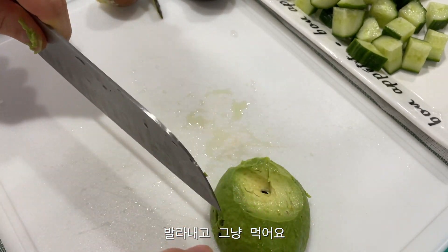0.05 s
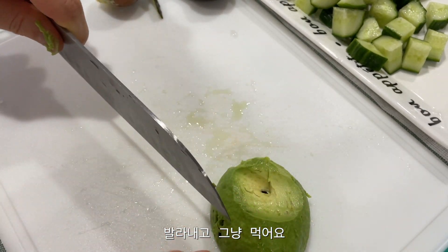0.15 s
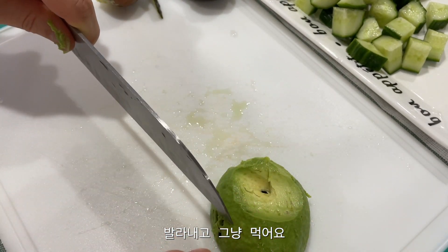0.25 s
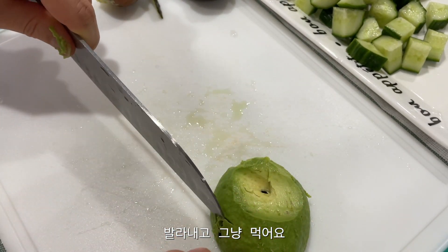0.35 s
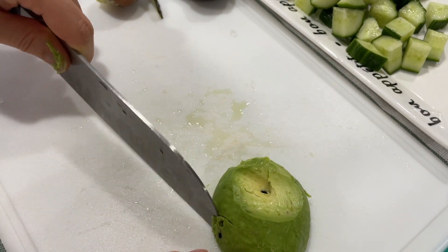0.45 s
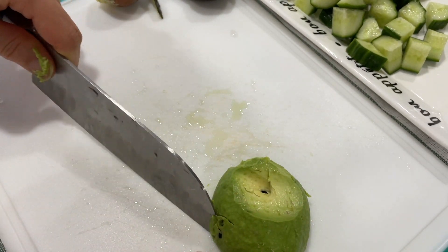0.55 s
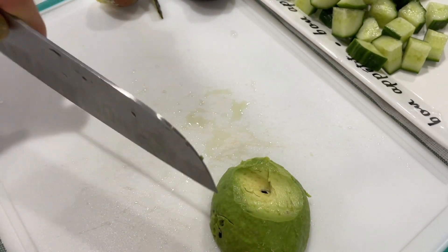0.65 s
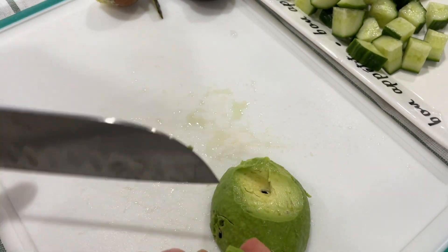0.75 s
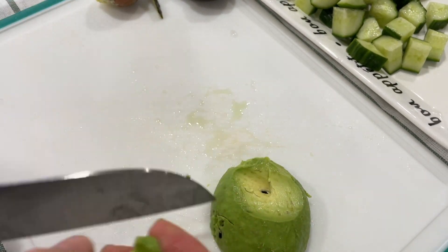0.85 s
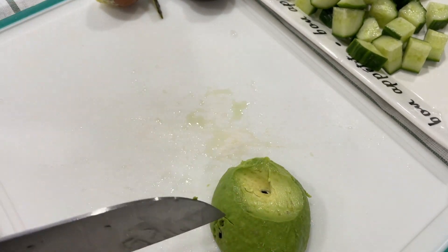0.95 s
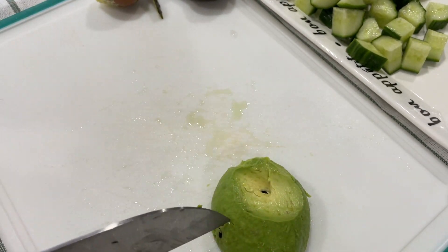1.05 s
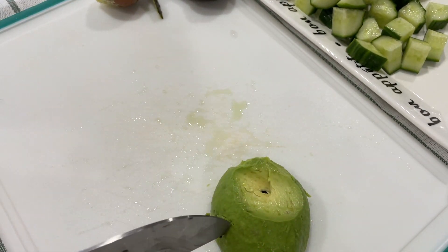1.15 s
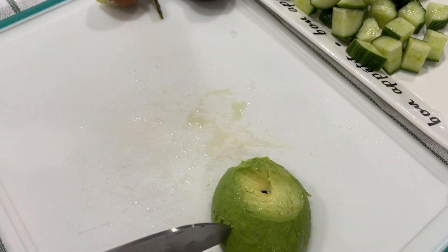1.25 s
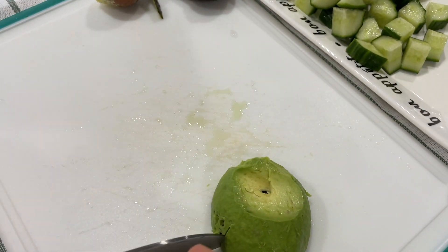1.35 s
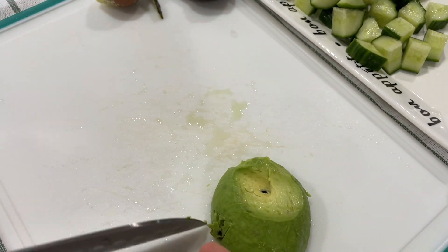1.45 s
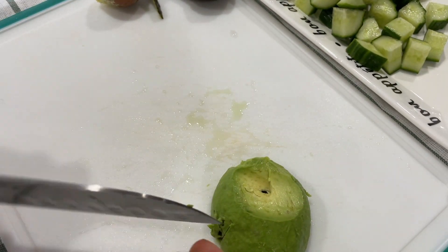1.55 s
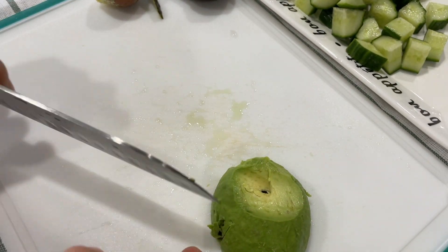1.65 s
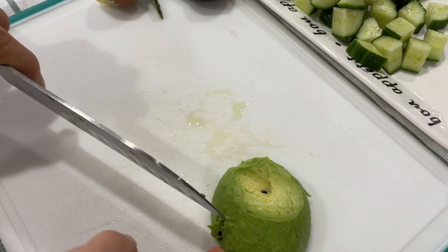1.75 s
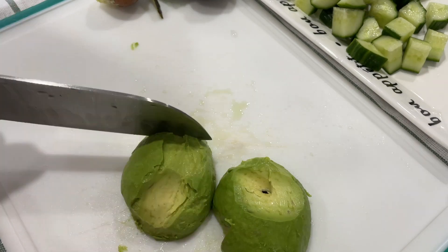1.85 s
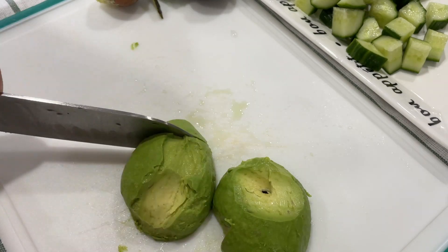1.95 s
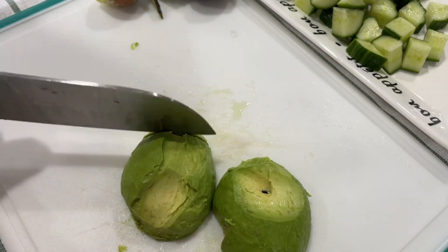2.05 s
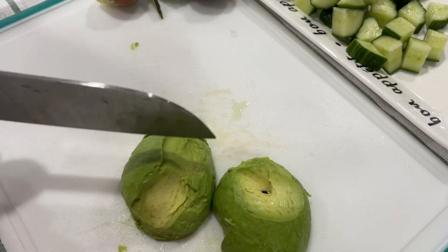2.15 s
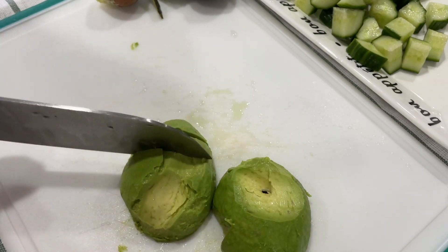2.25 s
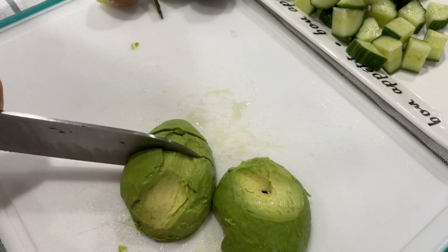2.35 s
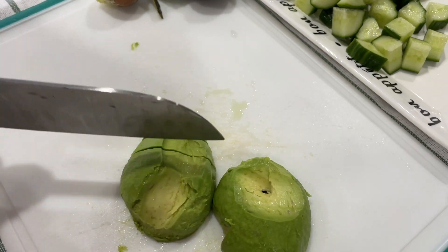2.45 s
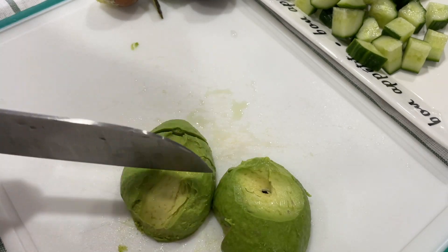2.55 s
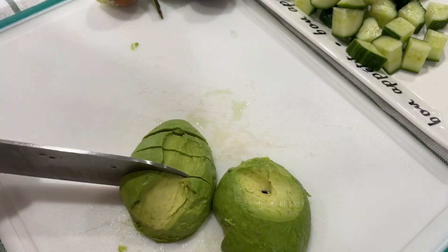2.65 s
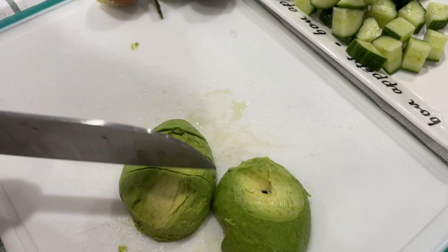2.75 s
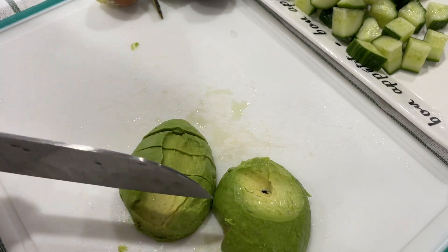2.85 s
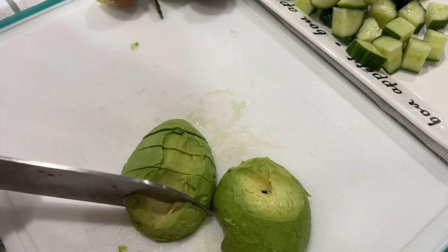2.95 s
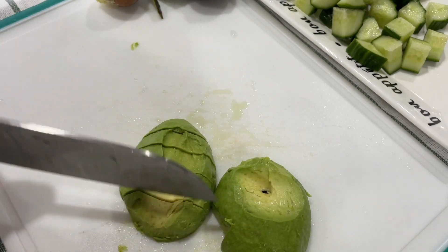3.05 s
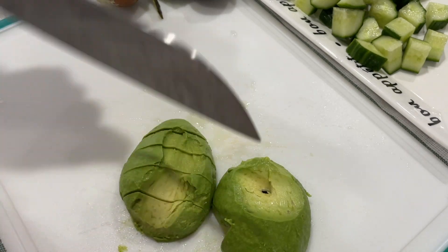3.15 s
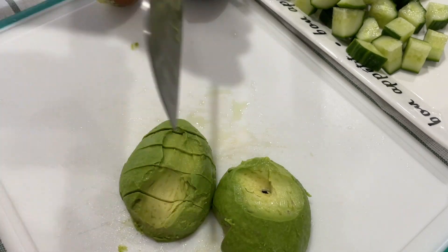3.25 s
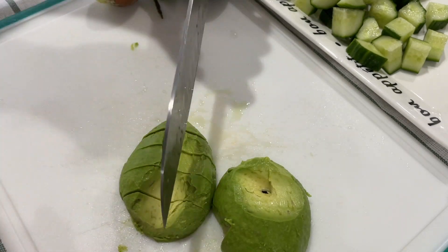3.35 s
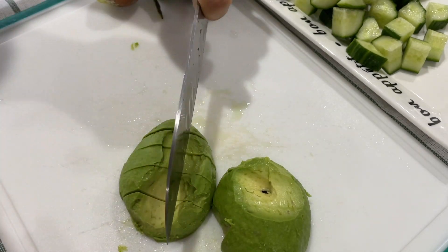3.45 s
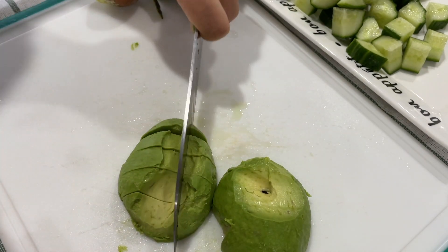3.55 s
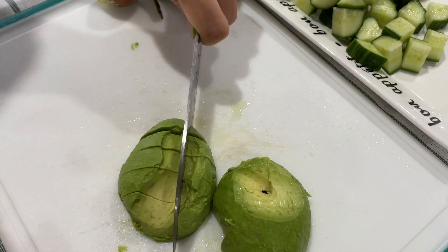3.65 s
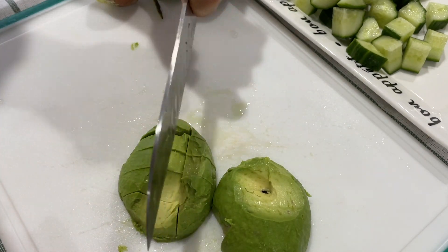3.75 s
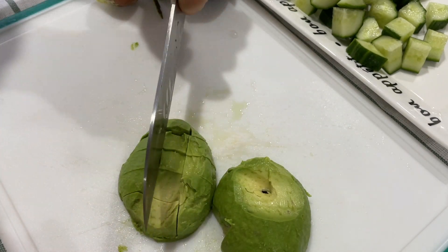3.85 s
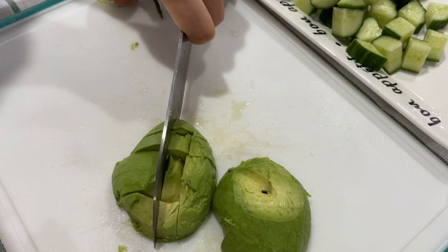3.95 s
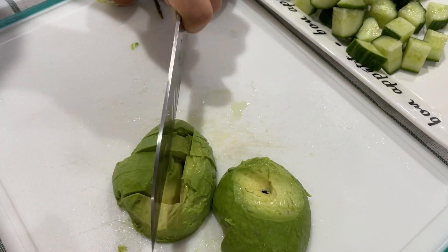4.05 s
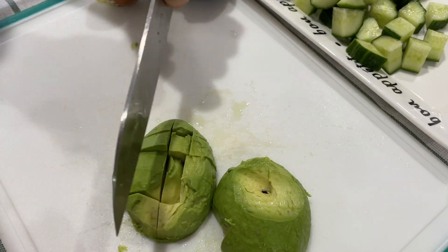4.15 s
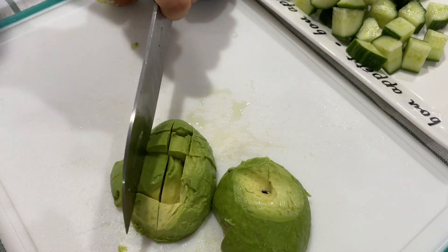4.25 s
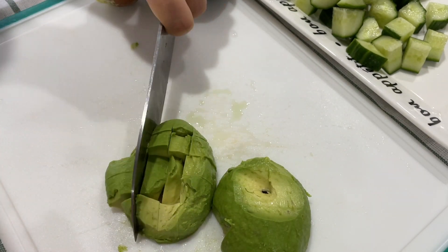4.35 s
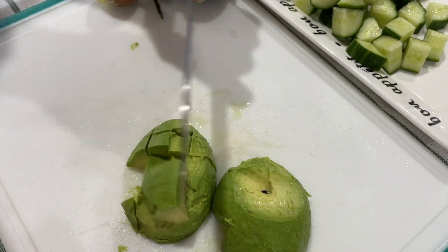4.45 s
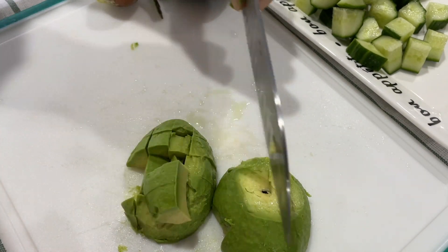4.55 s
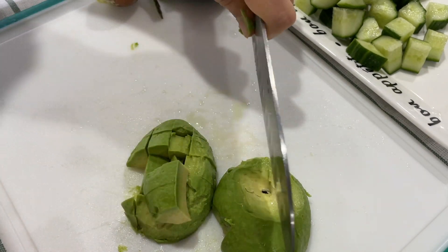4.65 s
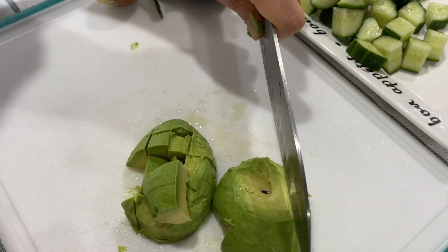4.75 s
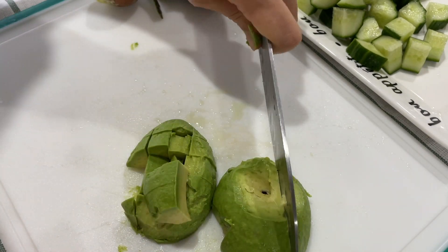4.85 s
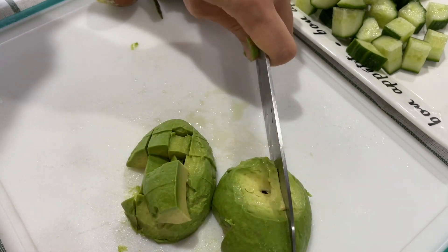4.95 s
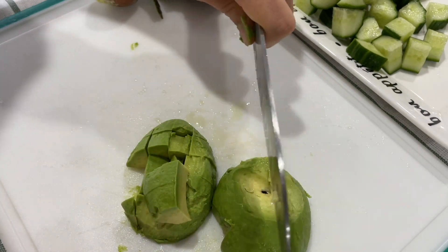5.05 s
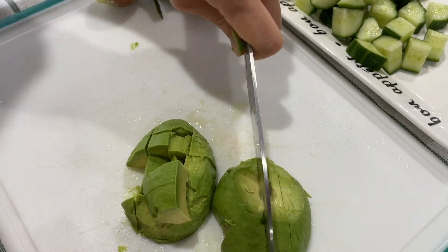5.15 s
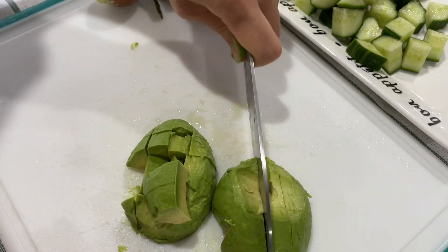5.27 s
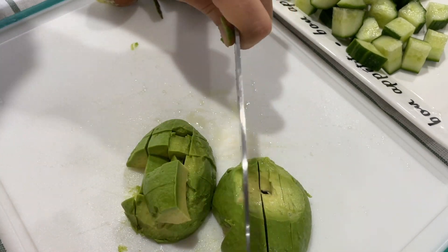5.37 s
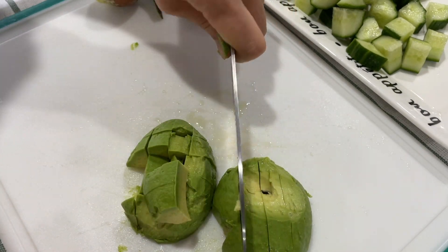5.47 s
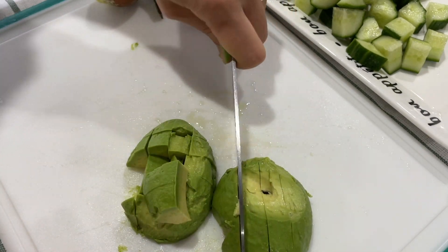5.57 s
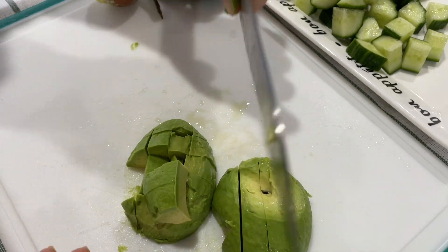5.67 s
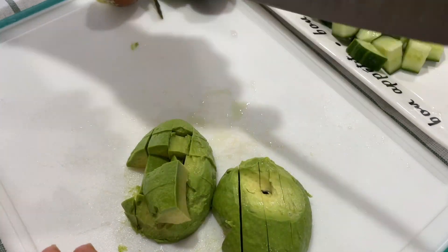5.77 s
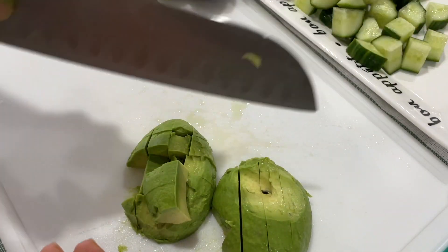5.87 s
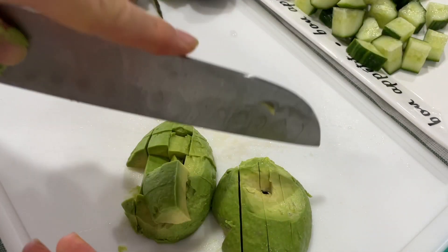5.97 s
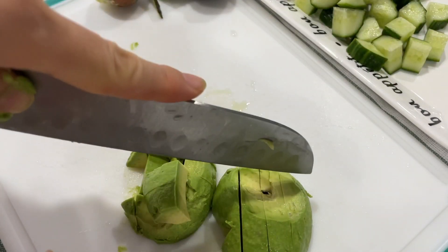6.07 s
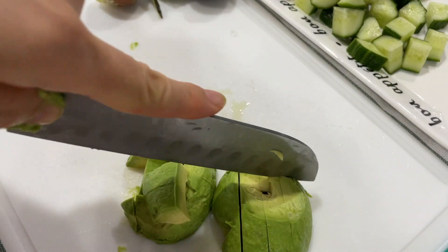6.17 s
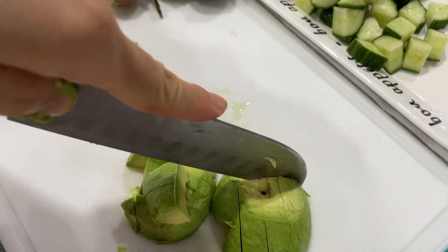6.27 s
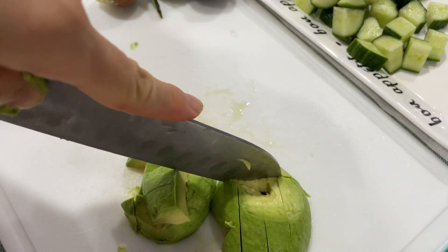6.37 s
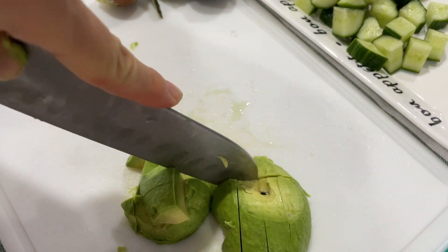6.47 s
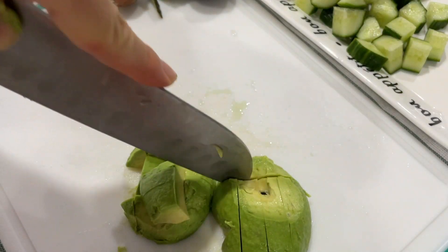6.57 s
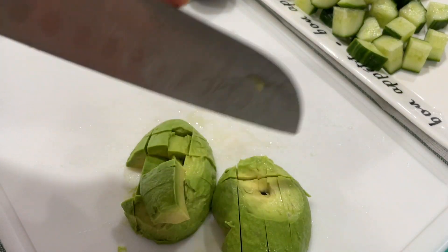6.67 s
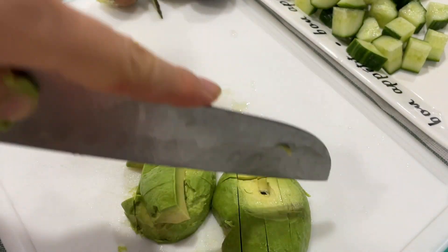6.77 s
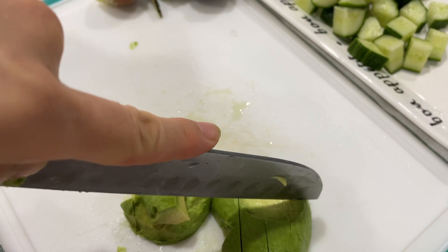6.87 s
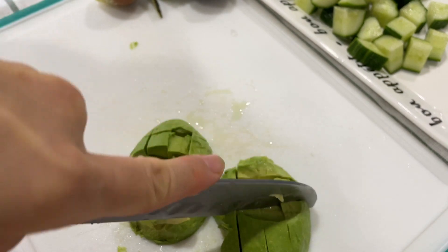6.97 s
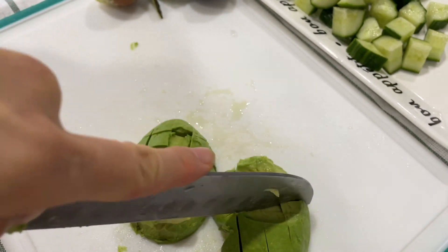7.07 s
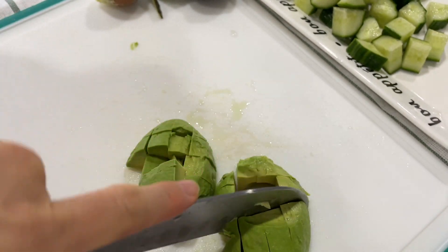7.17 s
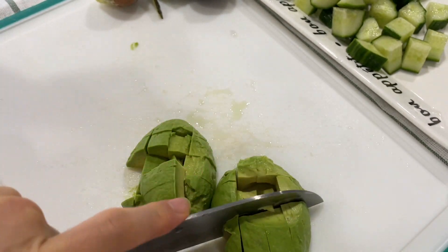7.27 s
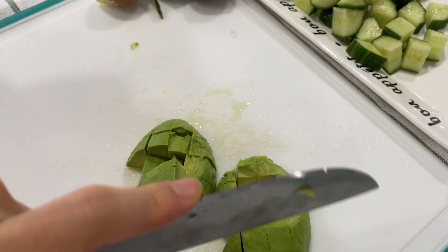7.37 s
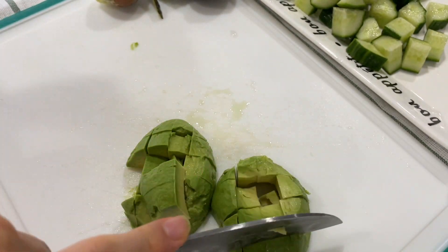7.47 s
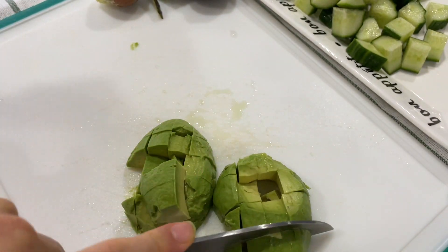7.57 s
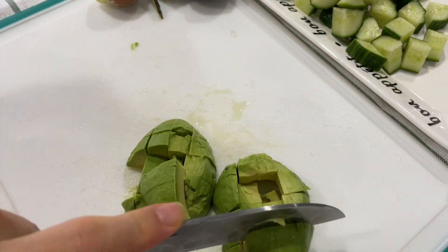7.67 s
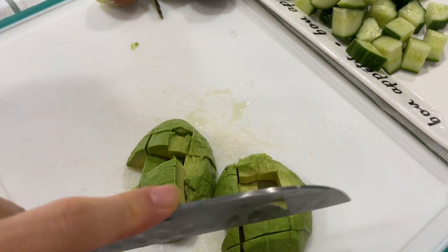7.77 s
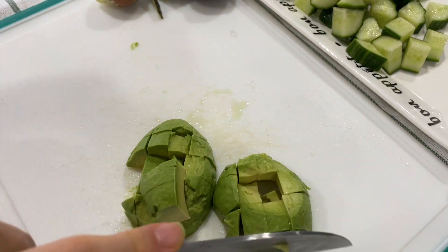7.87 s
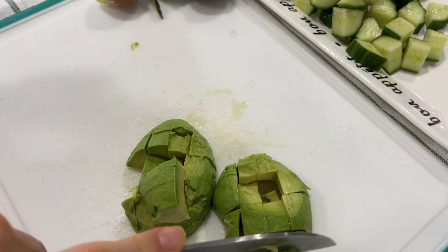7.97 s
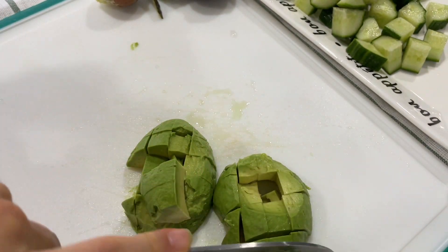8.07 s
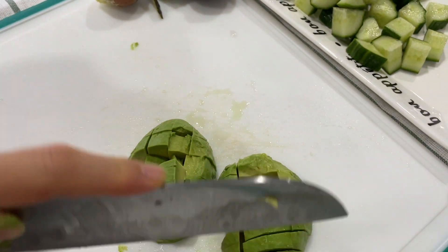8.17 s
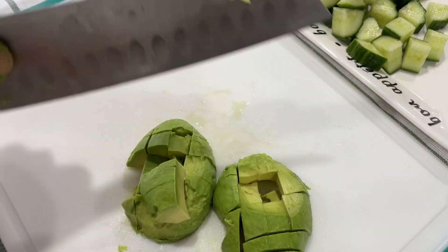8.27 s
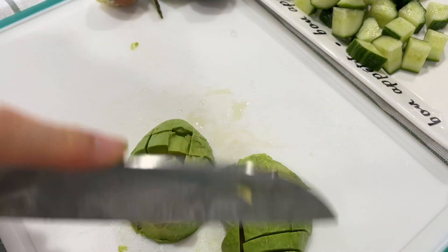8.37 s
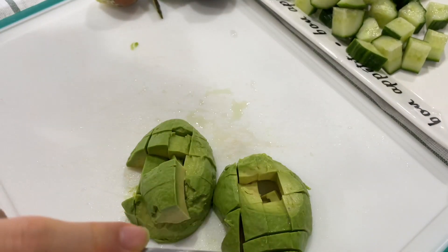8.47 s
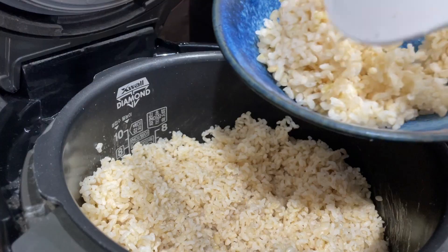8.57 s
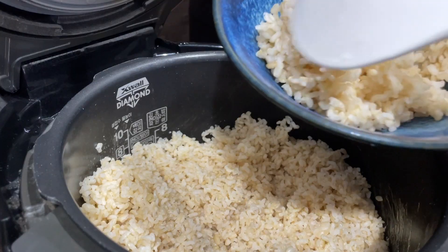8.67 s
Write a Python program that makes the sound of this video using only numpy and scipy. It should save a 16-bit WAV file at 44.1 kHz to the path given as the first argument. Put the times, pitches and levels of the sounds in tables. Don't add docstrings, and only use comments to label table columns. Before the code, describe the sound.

A knife dices soft avocado on a plastic board, heard close in stereo. Faint cuts come first, then knocks of quick clustered contacts, loudest near 3.6 and 4 seconds. Steady cuts follow, then duller firm presses after six seconds and a strong knock at 7.5. Grainy slides and tiny wet clicks fill gaps; short kitchen echoes and faint fan hum surround it.

```python
import sys
import numpy as np
from scipy import signal
from scipy.io import wavfile
from scipy.ndimage import uniform_filter1d

SR = 44100
rng = np.random.default_rng(int(sys.argv[2]) if len(sys.argv) > 2 else 0)


def ratio(d):
    e = np.asarray(d, float) / 20
    return 10 ** e


def wav_record(signal):
    frames = np.transpose(np.atleast_2d(signal))
    bounded = np.clip(frames, -1, 1)
    quanta = np.round(bounded * 32767).astype(np.int16)
    wavfile.write(sys.argv[1], SR, quanta)


N = 384552
PORTS_HZ = 620

# [t/s, thump/dB, room share of knock/dB, room share of hard ring and crack/dB, crack/dB]
CUTS = [(0.486, -40.5, -11.5, -3, -30.5), (1.306, -47, -10.5, 1, -23.5), (1.439, -45, -6.5, -23, -18),
        (1.95, -52.5, -11, -3.5, -23.5), (2.311, -41, -4.5, 2, -31), (2.645, -35, -2.5, -0.5, -17.5),
        (2.98, -62, -5, -3, -17.5), (3.578, -23.5, -20, -21, -13), (3.941, -22, -16.5, -8.5, -20.5),
        (4.332, -40, -12, 0, -22), (4.908, -34, -9, 1.5, -16.5), (5.215, -62, -6, 0, -17),
        (5.523, -70, -5, 4, -23.5), (6.25, -48, -18.5, -16.5, -21.5), (6.384, -35, -16.5, -10.5, -24),
        (6.494, -54.5, -30, -26.5, -32), (6.989, -52.5, -19.5, -19, -28), (7.185, -44, -28, -23.5, -32),
        (7.525, -17.5, -12.5, -3.5, -13.5), (8.016, -44, -10, -3.5, -10)]
# [t of belly/s, knock/dB, hardness/dB, gap/s, gain per contact/dB]
ROCKED_CUTS = [(0.49, -20, -17, .0037, -5.5), (1.3087, -19, -16.5, .0034, 6),
               (1.956, -19.5, -15.5, .006, 0.5), (2.3247, -23, -12, 0.005, -8),
               (2.6523, -25, -6.5, .0035, -3.5), (2.981, -24.5, -7.5, .0034, 4.5),
               (3.5802, -10, 0, 0.0026, 3), (3.9487, -13, -10.5, .004, -4), (4.3344, -19.5, -12, .0042, 6),
               (4.9155, -22.5, -9.5, 0.0045, -3), (5.2209, -21.5, -11, .0033, 2.5),
               (5.5283, -23, -14.5, .0035, -8.5), (7.535, -15, -7.5, .0065, -2),
               (8.0208, -20.5, -4, .0045, 3)]


def highpass(x, hz):
    return signal.sosfilt(signal.butter(2, hz, "high", fs=SR, output="sos"), x)


def lowpass(x, hz, order):
    return signal.sosfilt(signal.butter(order, hz, fs=SR, output="sos"), x)


def ring(x, hz, width_hz):
    radius = np.exp(-np.pi * abs(width_hz) / SR)
    angle = 2 * np.pi * hz / SR
    return signal.lfilter([0, np.sin(angle)], [1, -2 * radius * np.cos(angle), radius ** 2], x)


def band(x, hz, width_hz):
    return signal.lfilter(*signal.iirpeak(hz, hz / width_hz, fs=SR), x)


def blows(t_s, gains):
    x = np.zeros((len(gains), N))
    at = np.minimum((np.asarray(t_s) * SR).astype(int), N - 1)
    np.add.at(x, (slice(None), at), gains)
    return x


def walk(rate_hz):
    hold = int(SR / rate_hz)
    steps = np.repeat(rng.standard_normal(N // hold + 1), hold)
    return 1.12 * uniform_filter1d(uniform_filter1d(steps, hold), hold)[:N]


def ports(mid, side):
    side = highpass(side, PORTS_HZ) + ratio(-13.0) * side
    return np.array([mid + side, mid - side])


def struck(modes, t_s, db, pan_db, wet_db, scatter_db):
    chance = rng.standard_normal((len(t_s), 2, len(modes)))
    out = 0
    for k, (hz, width_hz, mode_db) in enumerate(modes):
        near_db = scatter_db * chance[:, 0, k]
        lean_db = min(hz / PORTS_HZ / 2, 1) * (pan_db / 2 + scatter_db * chance[:, 1, k]) / 2
        gains = ratio(db + mode_db + np.array([near_db + lean_db, near_db - lean_db, wet_db]))
        out = out + (-1) ** k * ring(blows(t_s, gains), hz, width_hz)
    return out


def soften(x, size):
    return signal.oaconvolve(x, np.hanning(size)[None] / np.hanning(size).sum())[:, :N]


def fan():
    # [f/Hz, level per third octave/dB]
    spectrum = [(25, -89.5), (60, -65), (90, -73), (320, -63), (700, -79.5), (1150, -81.5), (1500, -96),
                (11000, -100)]
    level_db, swell_db, flicker_db = -56.5, 0.7, 1.0
    points_hz, points_db = np.transpose(spectrum)
    swell = walk(2.0)
    out = 0
    for hz in 22 * 2 ** np.arange(0, 9.4, 1 / 3):
        noise = band(band(rng.standard_normal((2, N)), hz, hz / 3), hz, hz / 3) / np.sqrt(hz)
        band_db = np.interp(np.log(hz), np.log(points_hz), points_db)
        out = out + ratio(band_db + swell_db * swell + flicker_db * walk(15)) * noise
    out = ports(*out)
    return out * ratio(level_db) / np.std(out)


def taps():
    # [t/s, peak/dB, f/Hz]
    far_taps = [(0.087, -72.5, 2200), (0.324, -59, 1437), (.728, -55, 1404), (.997, -61, 1230),
                (1.205, -56.5, 1414), (1.655, -68, 2200), (3.556, -82, 2910), (4.567, -65, 3716),
                (5.167, -49.5, 1450), (6.72, -74.5, 2700), (7.749, -67, 2317)]
    out = 0
    for t_s, db, hz in far_taps:
        gains = ratio(db + np.array([[4.5], [4.5], [1.5]]))
        blow = band(blows([t_s], gains), 1.2 * hz, 570)
        out = out + ring(blow, hz, 60) - ratio(-2.0) * ring(blow, 1.17 * hz, 70)
    return out


def room(x):
    # [delay/s, level/dB]
    reflections = [(.0038, -2), (.0072, -8.5), (.011, -12.5), (.0172, -18), (0.0215, -14), (.031, -16.5),
                   (0.064, -16.5)]
    # [f/Hz, t60/s, level/dB]
    tail_bands = [(780, 0.29, -25.5), (2200, 0.33, -25), (5770, 0.085, -28), (11000, 0.09, -26)]
    bend = 1.152
    t = np.arange(SR // 2) / SR
    echoes = np.zeros((2, len(t)))
    for k, (delay_s, db) in enumerate(reflections):
        echoes[:, int(delay_s * SR)] = ratio(db) * np.array([1, 0.4 * (-1) ** k])
    edges = [0] + [int((cut[0] - 0.03) * SR) for cut in CUTS] + [N]
    out = np.zeros((2, N + len(t)))
    lumps = ratio(2.7 * walk(250))
    onset = 1 - np.exp(-t / 0.005)
    for a, b in zip(edges, edges[1:]):
        noise = rng.standard_normal((2, len(t))) * np.roll(lumps, -a)[:len(t)] * onset
        tail = 0
        for hz, t60_s, db in tail_bands:
            tail = tail + ratio(db - 60 * (t / t60_s) ** bend) * band(noise, hz, 1.13 * hz)
        out[:, a:b + len(t) - 1] += signal.fftconvolve(x[None, a:b], ports(*(tail + echoes)), axes=1)
    return out[:, :N]


def slides():
    # [f/Hz, width/Hz, level/dB]
    rasp_bands = [(1600, 4900, -0.5), (2700, 5600, 6), (4330, 9000, -5.5), (6223, 1800, -29)]
    # [length/s, rise/s, hiss/dB, rasp above hiss/dB]
    enter = (0.065, .03, -99, 15)
    # [length/s, rise/s, hiss/dB, rasp above hiss/dB]
    leave = (-0.0156, .02, -91.5, 13)
    # [t/s, length/s, hiss/dB, rasp above hiss/dB]
    lone_strokes = [(0.718, 0.093, -91, 12.5), (1.614, 0.27, -106, 8), (1.87, 0.07, -99, 13.5),
                    (2.606, 0.12, -88.5, -2), (2.895, 0.1, -86, -7), (3.162, 0.061, -98, 9),
                    (3.667, 0.028, -86, 9), (3.902, 0.026, -82, -17), (4.011, 0.04, -80.5, 5.5),
                    (4.56, 0.045, -99, 9.5), (4.651, 0.082, -99, 19.5), (4.776, 0.034, -101, 16),
                    (4.872, 0.06, -101, 25.5), (5.202, 0.04, -92, 17), (5.51, 0.03, -98, 13.5),
                    (5.594, 0.04, -83.5, 5.5), (5.693, 0.04, -95, 10.5), (5.816, 0.045, -88, 13.5),
                    (6.04, 0.3, -102, 10.5), (6.417, 0.045, -85, 13), (6.704, 0.031, -101, 10),
                    (6.828, 0.049, -103, 20.5), (7.16, 0.049, -78.5, -10), (7.22, 0.091, -73, -9),
                    (8.083, 0.06, -93, 15), (8.639, 0.076, -92.5, 8)]
    lead_s, lag_s, lone_rise_s = 0.022, 0.03, 0.016
    strokes = [(cut[0] - lead_s, *enter) for cut in ROCKED_CUTS]
    strokes += [(cut[0] + lag_s, *leave) for cut in ROCKED_CUTS]
    strokes += [(t_s, length_s, lone_rise_s, *levels) for t_s, length_s, *levels in lone_strokes]
    grains = rng.standard_normal((2, N)) * ratio(3.8 * rng.exponential(size=N) - 5.5 + 1.8 * walk(67))
    hiss_gain, rasp_gain = np.zeros((2, N))
    for start_s, length_s, rise_s, hiss_db, rasp_db in strokes:
        end_s = start_s + length_s
        span = slice(int((start_s - rise_s) * SR), min(int(end_s * SR) + SR // 20, N))
        t = np.arange(span.start, span.stop) / SR
        rise = (t - start_s) / rise_s + 0.5
        fall = (end_s - t) / 0.03 + 0.5
        stroke = np.clip(np.minimum(rise, fall), 0, 1) ** 2
        hiss_gain[span] += ratio(hiss_db + 9.5) * stroke
        rasp_gain[span] += ratio(hiss_db + rasp_db + 9.5) * stroke
    hiss = band(band(hiss_gain * grains, 10600, 3800), 10600, 3800)
    rasp = 0
    for hz, width_hz, db in rasp_bands:
        rasp = rasp + ratio(db) * band(band(rasp_gain * grains, hz, width_hz), hz, width_hz)
    slide = hiss + lowpass(rasp, 8500, order=2)
    return np.vstack([ports(*slide), ratio(-13.5) * slide[0]])


def smacks():
    # [t/s, peak/dB, body/dB]
    wet_smacks = [(1.4376, -59, 0), (2.048, -53, -15), (2.3277, -60, 0), (2.396, -65, 0),
                  (2.4049, -48, -13), (2.646, -65, -9), (2.655, -54, -4), (2.757, -61, -2),
                  (3.043, -65, -8), (3.1714, -65.5, 0), (3.5175, -63.5, -12.5), (3.6747, -64, 0),
                  (3.915, -56.5, -3), (3.937, -57, -10), (4.095, -69.5, -7), (4.3238, -62, -11),
                  (4.3697, -69, 0), (4.6616, -72, 0), (4.9965, -60, -8), (5.188, -73, 0), (5.3043, -61, 1),
                  (5.603, -60, -10), (5.8915, -74, 0), (6.2423, -60, -1), (6.992, -51, 0),
                  (7.0595, -62, -10), (7.0766, -51, -1), (8.0248, -46.5, -9), (7.1843, -51, 0)]
    t_s, db, body_db = np.transpose(wet_smacks)
    centre, wet_db = 0 * t_s, -12 + 0 * t_s
    click = struck([(10900, 3200, 7), (13500, 2900, -3)], t_s, db + 4.0, centre, wet_db, scatter_db=4.5)
    body = struck([(4500, 650, 0.0042), (6500, 5400, 0.0062)], t_s, db + np.minimum(body_db, 0),
                  centre, wet_db, scatter_db=4.0)
    return highpass(click + body, 3000)


def contacts():
    # [t/s, knock/dB, hardness/dB]
    pressed = [
        (1.441, -49, -16.5),
        (6.253, -23, -19.5),
        (6.3904, -21, -28.5),
        (6.5045, -13.5, -26),
        (6.9906, -13.5, -16),
        (7.1862, -11, -25.5),
    ]
    harden_db = 3.5
    t_s, db, hard_db, gap_s, gain_db = np.transpose(ROCKED_CUTS)[:, :, None]
    order = np.arange(3) - 1 + 0 * t_s
    rocked = [t_s + gap_s * order, db + gain_db * order, hard_db + harden_db * order, order]
    flat = np.vstack([np.transpose(pressed), np.zeros(len(pressed))])
    return np.hstack([np.reshape(rocked, (4, -1)), flat])


def knife():
    # [f/Hz, width/Hz, level/dB]
    knock_modes = [(380, 174, -8.5), (536, 140, -11), (659, 130, -4), (799, 304, 4), (1086.5, 240, -1.5),
                   (1450, 760, -5.5)]
    # [f/Hz, width/Hz, level/dB]
    hard_modes = [(1467, 770, 2), (2010, 363, 0.5), (2090, 170, 0.5), (2223, 270, 5), (3150, 1100, 3)]
    # [f/Hz, width/Hz, level/dB]
    crack_modes = [(3912, 740, 2.5), (4750, 3900, 8.5), (5200, 520, 1), (6696, 800, -9), (9700, 2300, -5.5)]
    # [f/Hz, width/Hz, level/dB]
    thump_modes = [(50.3, 67, -18), (87, 87, -4), (169, 79, -1), (294, 410, 1.5)]
    lean_db, lean_scatter_db = 7.5, 5
    belly_room_db, end_room_db = 7, -13
    crush_db, crush_s = -27, 0.0028
    t_s, db, hard_db, order = contacts()
    pan_db = lean_db + lean_scatter_db * rng.standard_normal(len(t_s))
    cut_s, thump_db, wet_db, hard_wet_db, crack_db = np.transpose(CUTS)
    cut = np.abs(t_s[:, None] - cut_s).argmin(axis=1)
    send_db = np.where(order == 0, belly_room_db, end_room_db)
    knock_send_db, hard_send_db = wet_db[cut] + send_db, hard_wet_db[cut] + send_db
    knock = struck(knock_modes, t_s, db + 0.5, pan_db, knock_send_db, scatter_db=2.5)
    hard = struck(hard_modes, t_s, db + hard_db - 5.5, pan_db, hard_send_db, scatter_db=5.0)
    crack = struck(crack_modes, t_s, db + crack_db[cut] - 6, 0.33 * pan_db, hard_send_db, scatter_db=4.5)
    thump = struck(thump_modes, cut_s + 0.0027, thump_db + 3.5, 24 + 0 * cut_s, wet_db - 6, scatter_db=1.74)
    knock = highpass(knock, 280)
    hits = soften(hard, size=9) - soften(knock, size=21) - soften(crack, size=5)
    lead_s = np.arange(-1023, 1) / SR
    crush = ratio(crush_db) * rng.standard_normal((1, len(lead_s))) * np.exp(lead_s / crush_s)
    return hits + signal.oaconvolve(hits, crush)[:, -N:] + soften(thump, size=81)


def bumps():
    # [t/s, peak/dB, f/Hz, rise and fall/s]
    counter_bumps = [
        (0.529, -51, 67.7, 0.018),
        (0.739, -44, 109.6, 0.018),
        (2.239, -43, 150, 0.0074),
        (4.789, -42, 140, 0.008),
        (4.839, -49, 135.7, 0.013),
        (8.58, -50, 121, 0.017),
        (8.649, -50, 170.4, 0.022),
        (8.689, -53.5, 187, 0.045),
    ]
    t = np.arange(N) / SR
    out = 0
    for t_s, db, hz, rise_s in counter_bumps:
        swell = np.exp(-((t - t_s) / rise_s - 1) ** 2)
        out = out + ratio(db) * swell * np.sin(2 * np.pi * hz * t)
    return out


def scene():
    left, right, wet = taps() + slides() + smacks() + knife()
    near = np.array([left, np.roll(right, shift=1)])
    return near + room(wet) + bumps() + fan()


def band_limit(x):
    return signal.sosfilt(signal.butter(12, 15800, fs=SR, output="sos"), x)


def record(dry):
    mid, side = (dry[0] + dry[1]) / 2, (dry[0] - dry[1]) / 2
    for _ in range(2):
        mid = mid - band(mid, 8270, 1200)
    both = lowpass([mid + side, mid - side], 12800, order=3)
    return band_limit(both)


dry = scene()
out = record(dry)
wav_record(out)
```